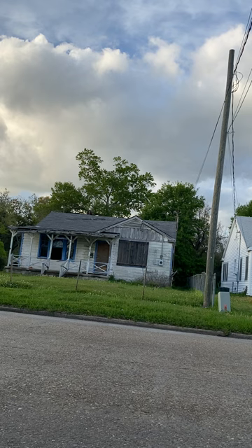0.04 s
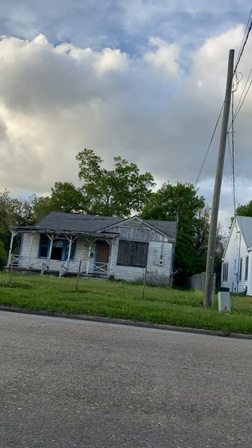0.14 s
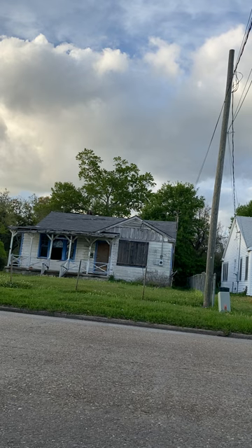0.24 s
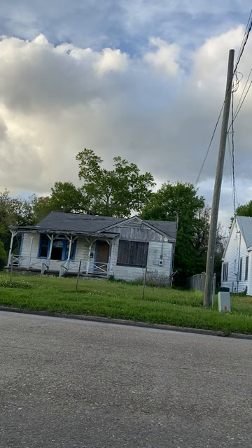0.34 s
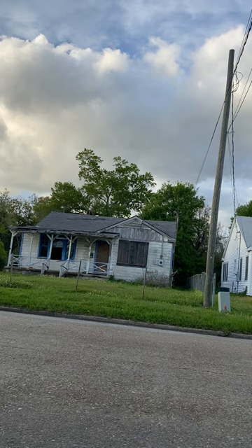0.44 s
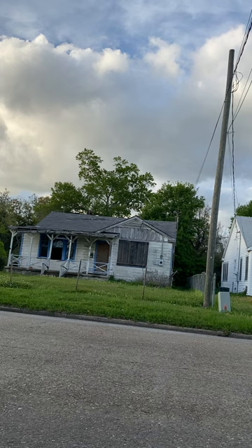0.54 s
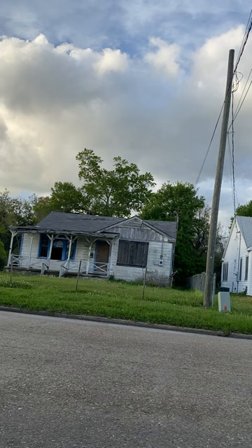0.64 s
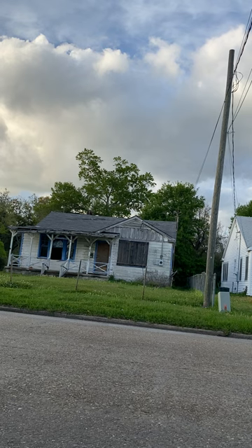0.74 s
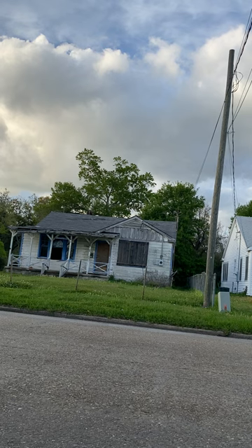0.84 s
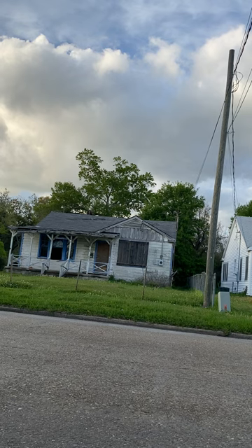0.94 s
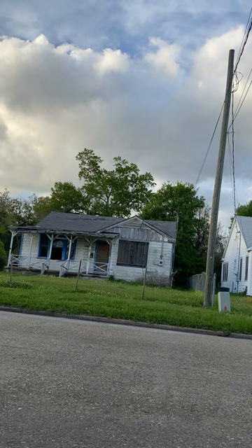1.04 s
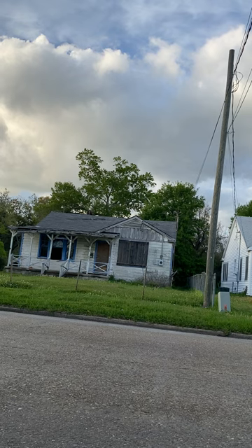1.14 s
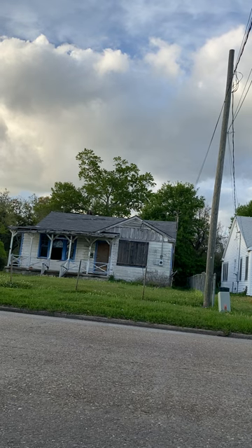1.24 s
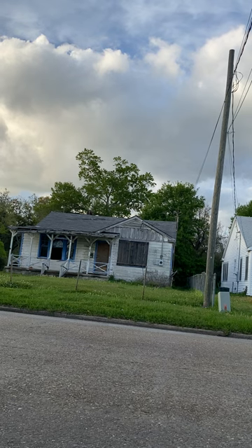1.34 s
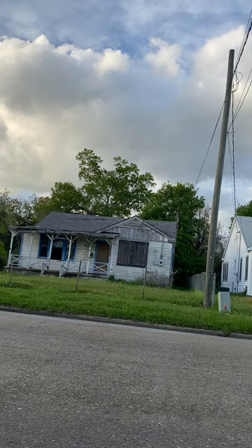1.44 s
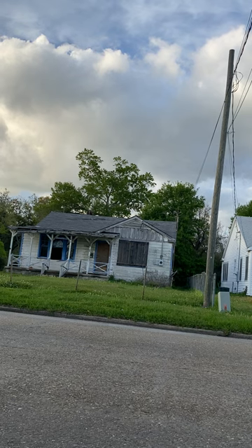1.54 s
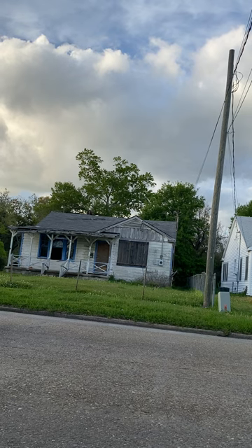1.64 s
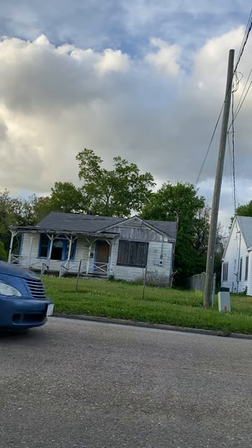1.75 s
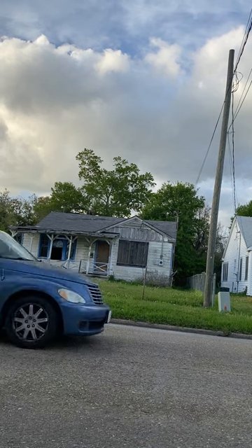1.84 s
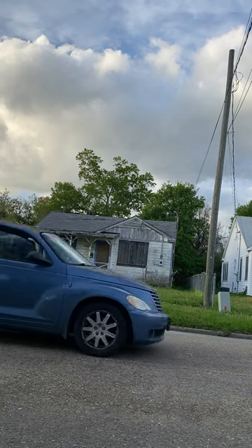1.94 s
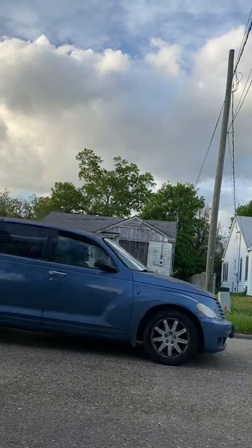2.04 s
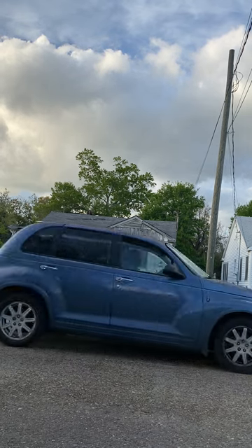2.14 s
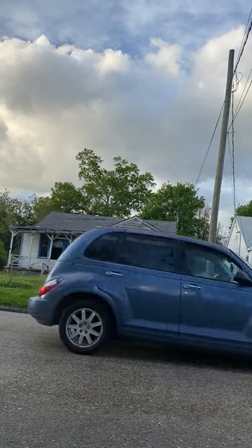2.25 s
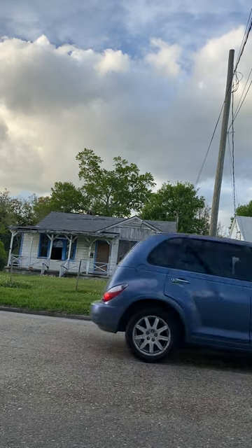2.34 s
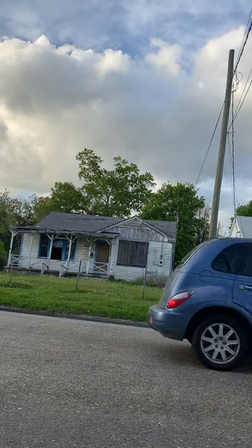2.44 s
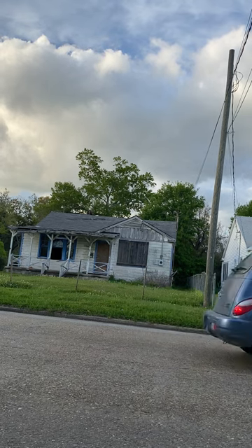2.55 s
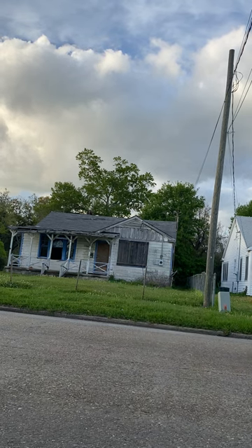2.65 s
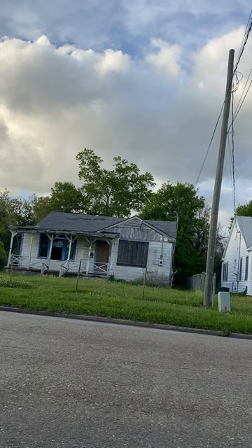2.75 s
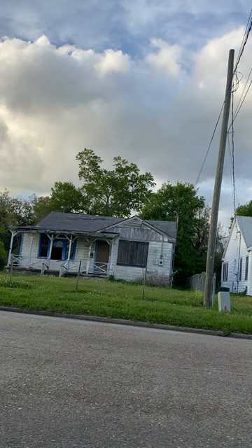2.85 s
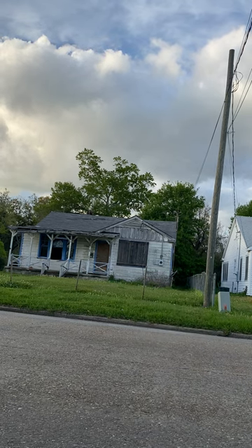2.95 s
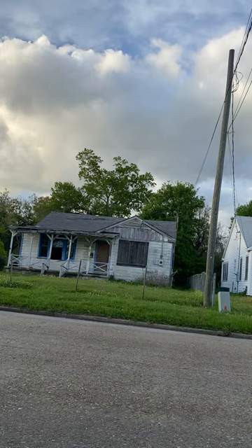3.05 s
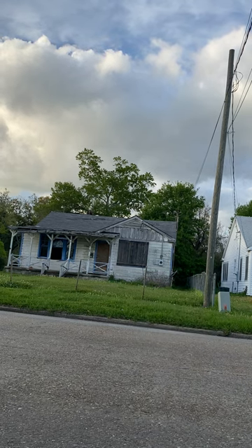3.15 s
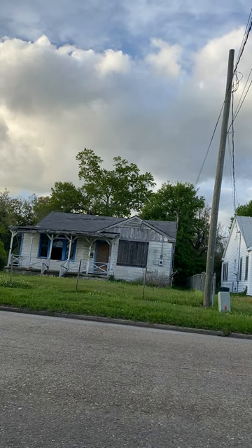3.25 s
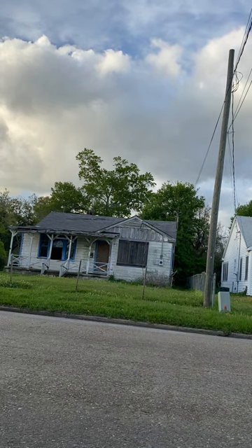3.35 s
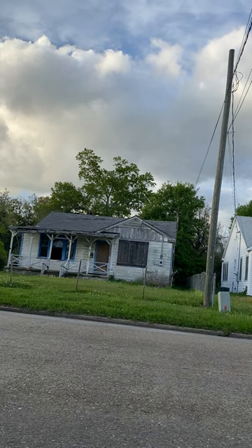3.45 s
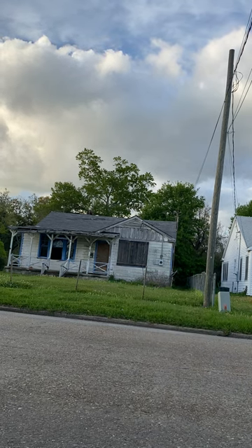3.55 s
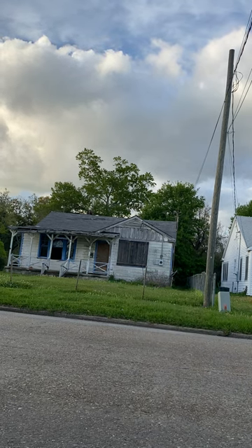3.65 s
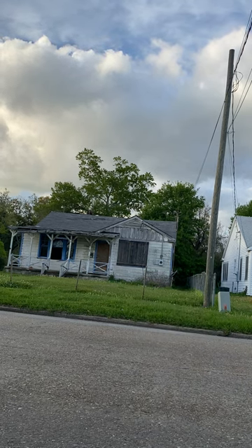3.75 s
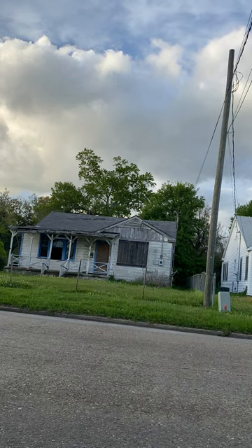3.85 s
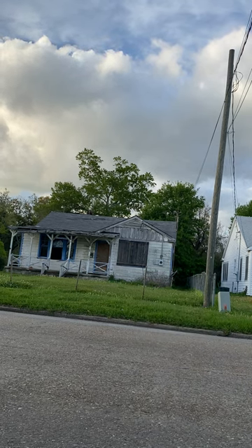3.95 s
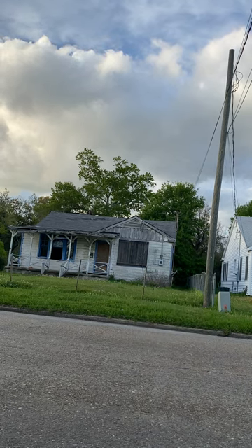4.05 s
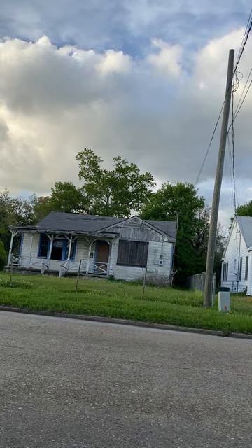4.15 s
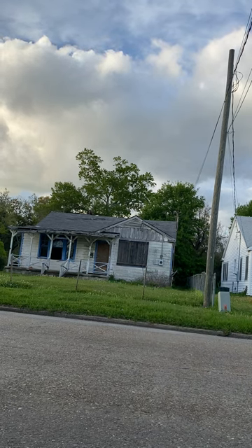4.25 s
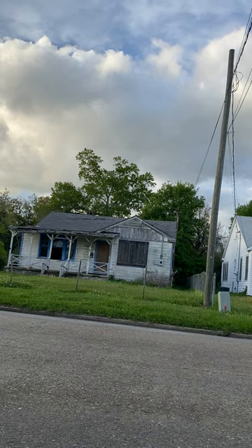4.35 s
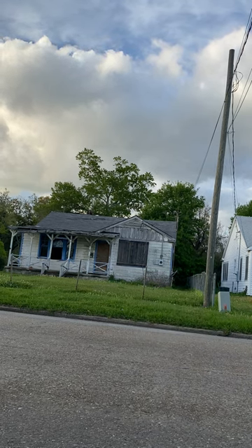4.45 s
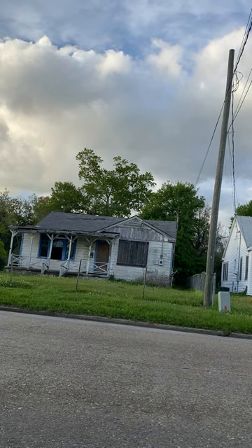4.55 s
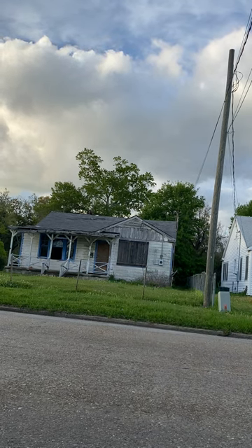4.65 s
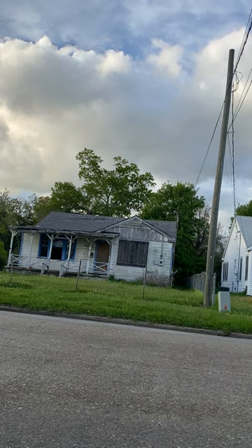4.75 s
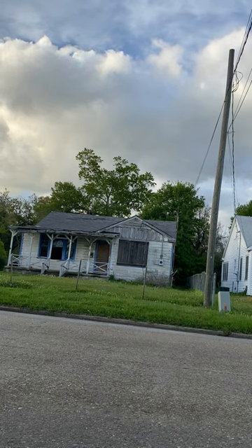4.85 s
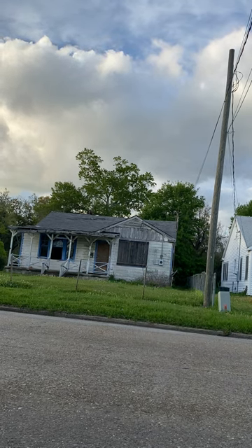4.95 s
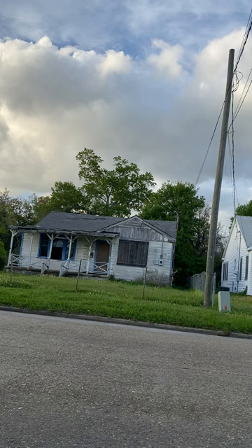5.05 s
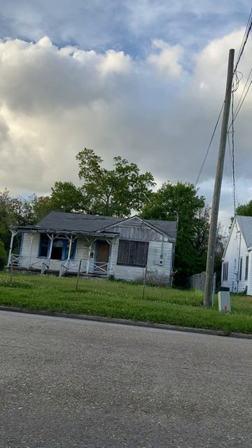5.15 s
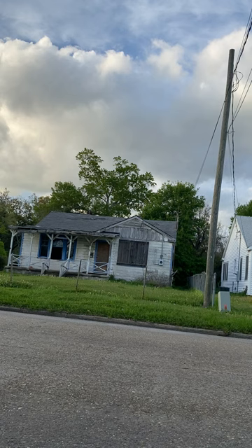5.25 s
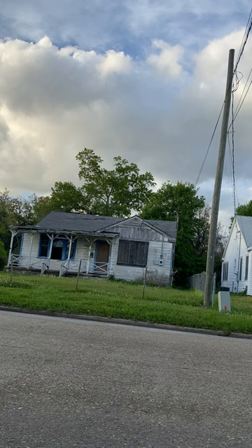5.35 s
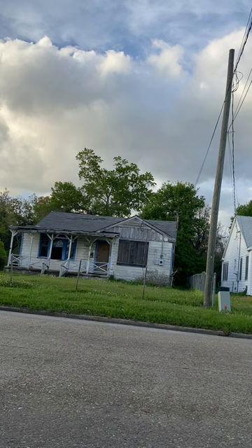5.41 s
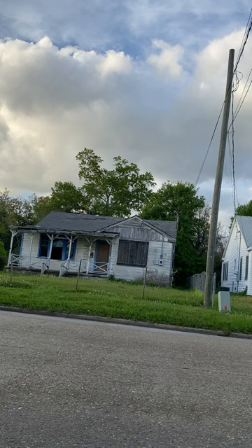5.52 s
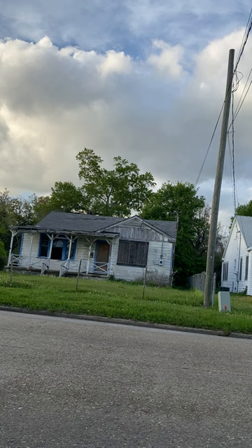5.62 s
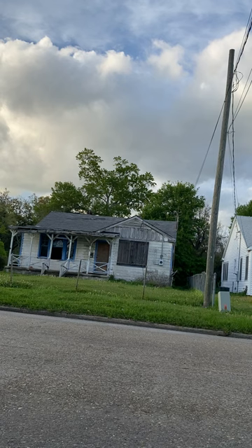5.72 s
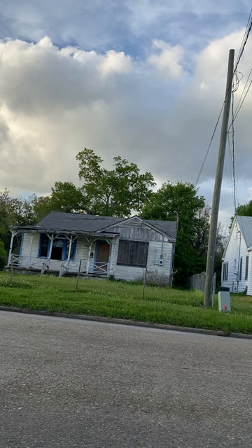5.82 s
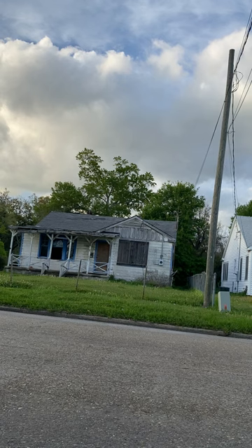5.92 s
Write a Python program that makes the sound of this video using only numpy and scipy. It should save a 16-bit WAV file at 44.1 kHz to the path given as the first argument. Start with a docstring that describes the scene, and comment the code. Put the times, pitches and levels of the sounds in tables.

```python
"""A quiet street: a car rolls slowly past a phone from left to right and pulls away.
The tyres are shaped noise: they roar and hiss on coarse asphalt, thump over seams and flick grit.
Engine, exhaust and tyre hums are wandering sines. As the car leaves, birds sing gliding tones.
Below the treble, the phone's two microphone ports turn bearing into phase and left-right balance."""
import sys
import numpy as np
from scipy import signal
from scipy.io import wavfile
from scipy.ndimage import uniform_filter1d

SR = 44100
rng = np.random.default_rng(int(sys.argv[2]) if len(sys.argv) > 2 else 0)


def unload_audio(sound):
    """Save the sound as a 16-bit wav file, at the path given as the first command line argument."""
    columns = np.transpose(np.atleast_2d(sound))
    # keep every value between -1 and 1, then stretch to whole-number steps
    steps = np.round(np.clip(columns, -1, 1) * 32767)
    wavfile.write(sys.argv[1], SR, steps.astype(np.int16))


N = 263718
FRAME, HOP = 2048, 512  # samples in each short slice of sound, and from one slice to the next

# the car's way past: (time [s], bearing at the ports, side of the car that colours the noise);
# both run 0 coming from the left, 1 abreast, 2 leaving right, 3 gone into the street noise
PATH = [(.75, 0, 0), (1.25, .17, .4), (1.75, .6, .92), (2.2, 1.05, 1.07), (2.9, 1.9, 1.83), (3.35, 2, 2),
        (4.25, 2.1, 2.1), (5.1, 3, 3)]
# wheels over seams in the road: (time [s], level [dB], top of the burst [Hz], fall by 60 dB [s],
# level of the tyre's ring [dB], dip of the roar just before [dB])
THUMPS = [(.826, -35, 1150, 0.26, -41, -1), (1.357, -29, 696, 0.2, -33, -2),
          (1.660, -26.5, 874, 0.3, -26, -2), (2.32, -29, 399.4, 0.14, -33, -1),
          (2.53, -31, 490, 0.16, -35, -1), (2.834, -28.5, 1458, 0.26, -28, -7),
          (3.786, -40, 1500, 0.06, -46, -6), (4.277, -45, 503, 0.11, -48, -1)]


def gain_of(db):
    """Turns decibels into a plain multiplier."""
    return 10 ** (np.asarray(db) / 20)


def evened(x):
    """Scales a signal to an average (rms) size of one."""
    return x / np.sqrt(np.mean(x ** 2) + 1e-20)


def columns(table, at):
    """Reads every column of a table at the points asked for, with straight lines between rows."""
    points, *rest = np.transpose(table)
    return [np.interp(at, points, column) for column in rest]


def add(mix, s, sound):
    """Adds a sound into the mix from s seconds on, cut off at the end."""
    part = mix[..., round(s * SR):][..., :sound.shape[-1]]
    part += sound[..., :part.shape[-1]]


def along(bearing, rows):
    """Blends four rows over frequency into a frequency x time field along the car's path."""
    share = np.maximum(1 - abs(bearing - np.arange(4)[:, None]), 0)
    return np.transpose(rows) @ share


def tyres(hz, t):
    """Road noise: its size in each frequency x time cell, with drifting patches."""
    # the pass: (time [s], tyre roar [dB], added to the rumble [dB], added to the hiss [dB])
    car_pass = [(0, -35.5, -1.5, 1), (.3, -34, 4, 1), (.9, -31.5, -1.5, 0), (1.4, -30, -0.5, -1.5),
                (1.65, -30, -0.5, -2.5), (1.9, -30, 1, 0), (2.15, -29.5, 0, -2), (2.4, -31, 3, -2),
                (2.9, -32, 2, -2.5), (3.4, -37, 4.5, 0), (3.9, -38.5, 2.5, 2.5), (4.3, -42.5, 5.5, 5.5),
                (4.7, -44.5, 2.5, 1), (5.3, -47, 1.2, -2.5), (5.98, -47.5, 2.5, -1)]
    # colour at each of the four sides: (frequency [Hz], level per Hz above the roar level [dB])
    colours = [
        [(25, -25), (50, -22.5), (85, -14), (140, -25.5), (240, -24), (340, -29), (620, -24.5), (1100, -25),
         (1700, -32.5), (2400, -42), (3600, -44), (5200, -54), (8000, -59.5), (15500, -75)],
        [(25, -31), (50, -19.5), (85, -16.5), (140, -17.5), (240, -19), (340, -26.5), (620, -24), (1100, -23),
         (1700, -35.5), (2400, -42.5), (3600, -47), (5200, -42.5), (8000, -52.5), (15500, -62.5)],
        [(25, -55), (50, -12), (85, -20.5), (140, -20), (240, -21.5), (340, -27), (620, -27), (1100, -25),
         (1700, -34.5), (2400, -47.5), (3600, -48.5), (5200, -49.5), (8000, -60.5), (15500, -71.5)],
        [(25, -35), (50, -10.5), (85, -9.5), (140, -12), (240, -19), (340, -29), (620, -26), (1100, -29),
         (1700, -35), (2400, -40.5), (3600, -38), (5200, -46), (8000, -55), (15500, -77.5)],
    ]
    # humps and dips of tread grooves and wheel arches: (centre [Hz], width [Hz], level [dB])
    tread = [(540, 103, 0), (835, 174, -2.5), (985, 160, 1), (1990, 100, 1.5), (2970, 390, 1.5),
             (4160, 1000, -3.5), (5000, 490, 2.5)]
    # the microphone's own treble colour: (frequency [Hz], level [dB])
    mic = [(6000, -1), (7000, 0.4), (8000, 4), (9500, -1.5), (11300, 0.5), (12500, 1.5), (14000, 0),
           (15700, 5)]
    roar_db, rumble_db, hiss_db = columns(car_pass, t)
    side = columns(PATH, t)[1]
    rows = []
    for colour in colours:
        colour_hz, level_db = np.transpose(colour)
        rows.append(np.interp(np.log(hz + 1), np.log(colour_hz), level_db))
    colour_db = along(side, rows)

    low = 1 / (1 + (hz / 300) ** 4)
    high = 1 / (1 + (2600 / (hz + 1)) ** 6)
    top = 1 / (1 + (7500 / (hz + 1)) ** 6)  # the finest fizz stays out of the hiss swell
    colour_db += np.outer(low, rumble_db) + np.outer(high - top, hiss_db)
    colour_db += sum(db * np.exp(-((hz - f) / width) ** 2) for f, width, db in tread)[:, None]
    colour_db += columns(mic, hz)[0][:, None]

    patches = uniform_filter1d(rng.standard_normal(colour_db.shape), size=12, axis=0)
    patches = evened(uniform_filter1d(patches, size=3, axis=1))
    flicker = uniform_filter1d(rng.standard_normal(colour_db.shape), size=90, axis=0)
    flicker = evened(uniform_filter1d(flicker, size=2, axis=1))
    flicker = flicker + 0.33 * rng.standard_normal(len(t))  # part of it is shared by all the treble
    colour_db += 1.4 * high[:, None] * flicker  # the hiss flickers finely and at random
    below = np.minimum(hz / 42, 1) ** 3.5  # the microphone loses the deepest bass
    return below[:, None] * gain_of(colour_db + roar_db + 1.1 * patches)


def fuzzy_tone(table, width_hz, fuzz):
    """A sine on a pitch curve; a share of it (fuzz, 0-1) wanders in size and phase, faster if wide."""
    t = np.arange(N) / SR
    hz, db = columns(table, t)
    r = np.exp(-np.pi * width_hz / SR)
    a, b = (evened(signal.lfilter([1], [1, -2 * r, r * r], v)) for v in rng.standard_normal((2, N)))
    wander = np.sqrt(1 - fuzz ** 2) + fuzz * (a + 1j * b) / np.sqrt(2)
    since_start, until_end = t - table[0][0] + .01, table[-1][0] - t + .01
    edges = np.clip(np.minimum(since_start, until_end) / .05, 0, 1)
    wave = (wander * np.exp(2j * np.pi * np.cumsum(hz) / SR)).real
    return np.sqrt(2) * gain_of(db) * edges * wave


def hums():
    """Engine firing tone, exhaust drones, the tyres' air ring, whines and sizzle, all fuzzy sines."""
    # engine firing tone, slowing and then picking up: (time [s], pitch [Hz], level [dB])
    firing = [(0, 49, -41), (.8, 39.2, -42), (1.3, 35.62, -48), (1.8, 35.97, -47), (2.5, 33.8, -38),
              (3.2, 30.7, -62), (3.8, 32.74, -52), (4.2, 38, -36), (4.5, 34.67, -52)]
    # exhaust drones, one sinking as the car draws level, an upper and a lower one as it pulls
    # away: (time [s], pitch [Hz], level [dB])
    drones = [
        [(0, 103.6, -37.5), (.6, 105.4, -66), (.85, 106.3, -41), (1.15, 106.4, -49), (1.38, 96.8, -39),
         (1.54, 96.6, -40), (1.7, 100.8, -47), (1.9, 95.2, -38), (2.05, 87.8, -31), (2.2, 84.7, -41),
         (2.35, 81.9, -33.5), (2.6, 76, -52)],
        [(3.86, 120.1, -37.5), (4.1, 123.7, -43), (4.25, 130.6, -41), (4.6, 135.2, -44.5), (4.83, 130.7, -38),
         (4.97, 129.4, -53.5), (5.3, 124.5, -46), (5.38, 124.5, -38.5), (5.59, 123.4, -39), (5.68, 123, -49),
         (5.98, 122, -63)],
        [(3.2, 77.1, -43), (3.6, 78.2, -41), (3.8, 74.5, -36.5), (4.03, 75.3, -46), (4.28, 75.2, -39.5),
         (4.45, 82.64, -45), (5.24, 82, -46.5), (5.57, 74.25, -51), (5.69, 74.5, -37.5), (5.98, 76, -47)],
    ]
    # two hums of the air ring inside the tyres, the upper one starting later:
    # (time [s], pitch [Hz], level [dB])
    tyre_ring = [
        [(0, 213.2, -54.5), (.5, 214.4, -48.5), (.93, 215.7, -41), (1.25, 215.4, -52), (1.6, 210, -58),
         (1.72, 207, -30), (1.9, 205, -54)],
        [(1.6, 244, -53), (1.7, 243, -41), (1.85, 244, -35.5), (1.95, 242, -38.5), (2.07, 240, -34),
         (2.2, 240, -38.5), (2.45, 250, -40.5), (2.65, 245, -39), (2.75, 228, -42), (2.88, 234, -35),
         (2.98, 245, -43), (3.15, 258, -41), (3.55, 241.3, -48)],
    ]
    # thin whines of tread blocks and a belt: (time [s], pitch [Hz], level [dB])
    whines = [
        [(3.45, 585, -53), (3.58, 600, -49), (3.65, 650, -54), (3.85, 661, -55), (4.05, 638, -53),
         (4.2, 657, -65), (4.35, 644, -60)],
        [(3.7, 585, -48), (3.95, 598, -56), (4.08, 629, -49), (4.2, 598, -54), (4.45, 589.7, -59.5),
         (4.68, 598, -70)],
        [(1.6, 11300, -72), (2., 11340, -71), (2.3, 11270, -67), (2.5, 11280, -75)],
    ]
    # two gritty bright bands in the hiss while the tyres are nearest:
    # (time [s], pitch [Hz], level [dB])
    sizzle = [
        [(1.3, 5350, -62), (1.55, 5395, -58), (1.72, 5270, -55), (1.92, 5300, -74), (2.1, 5300, -76),
         (2.4, 5246, -73)],
        [(1.4, 4800, -63), (1.7, 4830, -59), (1.93, 4770, -52), (2.15, 4720, -71), (2.4, 4670, -76)],
    ]
    out = fuzzy_tone(firing, width_hz=2.6, fuzz=0.54)
    out += sum(fuzzy_tone(curve, width_hz=10, fuzz=0.25) for curve in drones)
    out += sum(fuzzy_tone(curve, width_hz=20, fuzz=0.55) for curve in whines)
    out += sum(fuzzy_tone(curve, width_hz=12, fuzz=0.35) for curve in tyre_ring)
    return out + sum(fuzzy_tone(curve, width_hz=440, fuzz=0.87) for curve in sizzle)


def thumps():
    """Wheels over seams: each is a dull burst of noise that makes the struck tyre ring."""
    # how a struck tyre rings: (pitch before a small random shift [Hz], level against the thump's
    # ring level [dB], fall by 60 dB [s])
    tyre_modes = [(95, -1, 0.37), (226, -11, 0.32), (672, -19, 0.34)]
    hold_s = .022
    out, t = np.zeros(N), np.arange(8000) / SR
    after = np.maximum(t - hold_s, 0)
    for s, db, top_hz, t60_s, ring_db, _ in THUMPS:
        band = signal.butter(4, [60, top_hz], "band", fs=SR, output="sos")
        burst = signal.sosfilt(band, rng.standard_normal(len(t)))
        burst = evened(signal.lfilter([1], [1, -.95], burst))  # heavier in the bass
        sound = burst * gain_of(db - 60 * after / t60_s)
        for mode_hz, mode_db, mode_t60_s in tyre_modes:
            turns = mode_hz * rng.uniform(.96, 1.04) * t + rng.random()
            sound += gain_of(ring_db + mode_db - 60 * after / mode_t60_s) * np.sin(2 * np.pi * turns)
        add(out, s, sound * (1 - np.exp(-t / .001)))  # soft start
    return out


def knock():
    """A hollow knock: one tone that swells quickly and dies."""
    start_s, swell_s, t60_s = .3073, .007, .035
    level_db, pitch_hz = -21, 582
    out, t = np.zeros(N), np.arange(8000) / SR
    dying = gain_of(level_db - 60 * np.maximum(t - swell_s, 0) / t60_s)
    swell = np.sqrt(np.minimum(t / swell_s, 1))
    add(out, start_s, dying * swell * np.sin(2 * np.pi * pitch_hz * t))
    return out


def grit():
    """Each stone flicked by the tread is a very short ring, with crumbs rattling after it."""
    # flicked stones, ahead of the ports: (time [s], peak level [dB], pitch [Hz], width [Hz],
    # left minus right [dB])
    stones = [(.3075, -34, 2900, 600, 0), (.6096, -39, 2600, 500, 0), (2.4390, -31, 5000, 2200, 0),
              (2.4450, -34, 5900, 2000, 0), (2.4450, -31, 9000, 2600, 0), (2.4450, -38, 13200, 3400, -11),
              (2.7507, -43, 4800, 1200, 0)]
    crumbs_db, crumbs_t60_s, crumbs_share = -19, .06, .025  # share of samples that hold a crumb
    out, t, tail = np.zeros((2, N)), np.arange(400) / SR, np.arange(2000) / SR
    for s, db, hz, width_hz, pan_db in stones:
        u = np.pi * width_hz * t
        ring = u * np.exp(1 - u) * np.sin(2 * np.pi * hz * t)
        crumbs = rng.standard_normal(len(tail)) * (rng.random(len(tail)) < crumbs_share)
        crumbs = crumbs * gain_of(crumbs_db - 60 * tail / crumbs_t60_s)
        hits = np.where(tail > .001, crumbs, tail == 0)  # the stone first, then its crumbs
        sides = gain_of(db + pan_db * np.array([[.5], [-.5]]))
        add(out, s, sides * np.convolve(hits, ring))
    return out


def dips(noise):
    """The roar, not the hiss, sinks for a moment before each thump and is back with it."""
    dip_s, top_hz = .022, 1800
    dip_db, sink = np.zeros(N), np.sqrt(np.linspace(0, 1, round(dip_s * SR)))
    for s, *_, depth_db in THUMPS:
        add(dip_db, s - dip_s, depth_db * sink)
    roar = signal.sosfiltfilt(signal.butter(2, top_hz, fs=SR, output="sos"), noise)
    return noise + roar * (gain_of(uniform_filter1d(dip_db, size=44)) - 1)


def car():
    """All car sounds in two channels; below the treble, phase, likeness and balance follow bearing."""
    # the two ports at each of the four bearings: (frequency [Hz], left leads by [radians],
    # likeness of the two sides [0-1], left minus right [dB])
    ports = [
        [(150, 0.01, 1.0, -0.2), (300, 0.19, 0.98, -0.9), (600, 0.7, 0.99, 2.5), (1100, 0.66, 0.95, 7.0),
         (1700, 0.71, 0.97, 3.1), (2200, 1.87, 0.9, 1.6), (2700, 1.88, 0.89, 5.5), (3400, 1.18, 0.85, 3.6),
         (4000, 1.43, 0.84, 2.2), (4600, 2.75, 0.67, -1.1), (5200, 5.87, 0.42, 4.4), (5800, 7.59, 0.82, 2.1)],
        [(150, -0.01, 1.0, -0.1), (300, -0.03, 1.0, -0.7), (600, -0.08, 0.96, -0.4), (1100, 0.03, 0.97, 0.3),
         (1700, 0.09, 0.97, -0.5), (2200, 0.34, 0.86, -4.9), (2700, -2.0, 0.61, -3.1),
         (3400, -3.46, 0.42, -0.2), (4000, -1.52, 0.2, -4.1), (4600, -1.04, 0.58, -4.8),
         (5200, 0.26, 0.63, -2.0), (5800, 1.34, 0.83, 0.4)],
        [(150, -0.03, 1.0, -0.2), (300, -0.23, 0.98, -0.8), (600, -0.82, 0.95, -2.5), (1100, -0.99, 0.93, -3.2),
         (1700, -0.84, 0.93, -0.6), (2200, -0.59, 0.53, 4.7), (2700, -2.4, 0.59, 1.6), (3400, -1.71, 0.47, 1.0),
         (4000, -0.2, 0.36, 3.9), (4600, 1.8, 0.69, 2.6), (5200, 1.15, 0.86, 0.4), (5800, 1.41, 0.84, -1.2)],
        [(150, 0.0, 1.0, -0.2), (300, 0.05, 0.95, -0.7), (600, -0.33, 0.57, -0.9), (1100, -0.8, 0.69, -2.2),
         (1700, -0.55, 0.68, 0.0), (2200, 0.42, 0.3, 2.0), (2700, 0.09, 0.42, -1.2), (3400, 0.04, 0.4, 0.6),
         (4000, 0.71, 0.54, 1.6), (4600, 1.65, 0.35, 1.8), (5200, 1.06, 0.74, 2.6), (5800, 1.41, 0.8, 0.4)],
    ]
    # the treble keeps one left-right phase whatever the bearing, winding on as pitch rises:
    # (frequency [Hz], left leads by [half turns], likeness of the two sides [0-1])
    treble_phase = [(5800, .42, .83), (6600, .79, .87), (6950, 1, 1), (7650, 1, 1), (8200, 1.23, .79),
                    (9400, 1.7, .7), (9800, 2, 1), (10900, 2, 1), (11400, 2.24, .74), (12200, 2.62, .57),
                    (12700, 3, 1), (14300, 3, 1), (14600, 3.25, .58), (15800, 3.72, .66)]
    solid_sound = hums() + thumps() + knock() + grit()
    hz, t, solid = signal.stft(solid_sound, SR, nperseg=FRAME, noverlap=FRAME - HOP)
    pairs = [columns(p, hz) for p in ports]
    half_turns, treble_like = columns(treble_phase, hz)
    treble = (hz > treble_phase[0][0])[:, None]
    bearing = columns(PATH, t)[0]

    # a complex link holds likeness as its size and the left side's lead as its angle
    link = along(bearing, [like * np.exp(1j * lead) for lead, like, _ in pairs])
    link *= along(bearing, [like for _, like, _ in pairs]) / (abs(link) + 1e-9)
    link = np.where(treble, (treble_like * np.exp(1j * np.pi * half_turns))[:, None], link)
    like, turn = np.minimum(abs(link), 1), np.conj(link) / (abs(link) + 1e-9)
    # the balance evens out in treble and bass
    fading = np.clip(np.minimum((6600 - hz) / 800, hz / 150) ** 3, 0, 1)[:, None]
    tilt = gain_of(fading * along(bearing, [db for _, _, db in pairs]))

    a, b, c, d = rng.standard_normal((len(t), len(hz), 4)).T
    shared, apart = a + 1j * b, c + 1j * d
    size = tyres(hz, t) * np.sqrt(3 * SR / FRAME / 8)  # level per Hz to the size of a cell
    left = size * shared + solid[0]
    right = turn * (size * (like * shared + np.sqrt(1 - like ** 2) * apart) + solid[1])
    both = np.array([tilt * left, right]) * np.sqrt(2 / (1 + tilt ** 2))
    return dips(signal.istft(both, SR, nperseg=FRAME, noverlap=FRAME - HOP)[1][:, :N])


def chirp(s, top_hz, up_db, down_db, lead_in_db):
    """One bird chirp: the arch placed at a time, pitch and strength."""
    # a soft slow lead-in and a round arch: (time from the top [s], share of the top pitch,
    # level [dB])
    arch = [(-.07, .58, -22), (-.045, .64, -15), (-.024, .72, -11), (-.021, .75, -1), (-.013, .9, 0),
            (-.006, .985, -4), (.003, .995, -4), (.014, .88, 0), (.028, .75, -2)]
    lead_in_end_s = -.022
    at, share, db = np.transpose(arch)
    strength_db = np.where(at < 0, up_db, down_db) + lead_in_db * (at < lead_in_end_s)
    return np.transpose([s + at, top_hz * share, db + strength_db])


def sung(note, pan_db, lead, top_lead=0):
    """A pure gliding note; the ports give it a balance and a phase lead in radians, more near 3 kHz."""
    t = np.arange(note[0][0], note[-1][0], 1 / SR)
    hz, db = columns(note, t)
    hz = uniform_filter1d(hz, size=120, mode="nearest")
    # air and leaves make it flutter
    flutter_db = 3 * evened(uniform_filter1d(rng.standard_normal((2, len(t))), size=120))
    half = np.array([[.5], [-.5]])
    apart = (lead + top_lead * np.clip((hz - 2800) / 250, 0, 1)) * half
    wave = np.sqrt(2) * np.sin(2 * np.pi * np.cumsum(hz) / SR + apart)
    return gain_of(db + flutter_db + pan_db * half) * wave * signal.windows.tukey(len(t), .15)


def birds():
    """Arched chirps with their slap echoes, short straight glides, and a scatter from the street."""
    # a near bird on the right, before the arch shapes it: (time of the top [s], top pitch [Hz],
    # level going up [dB], level coming down [dB])
    chirps = [(4.952, 3130, -58.5, -59.5), (5.265, 3120, -55, -55.5), (5.568, 3080, -55, -53.5),
              (5.829, 3070, -56.5, -53.5)]
    # house fronts throw each chirp back: (delay [s], level [dB], added to the lead-in [dB],
    # left minus right [dB], left leads by [radians])
    slaps = [(.009, -7, 0, 9, 1.5), (.13, -6, 5, 8, 2.5), (.146, -8.5, 14, -6, .4), (.213, -13, -6, 5, 1.2)]
    # short straight glides: whistles, pieces of a curved whistle and parts of chirps:
    # (start [s], length [s], from [Hz], to [Hz], level [dB], left minus right [dB],
    # left leads by [radians])
    glides = [(4.276, .025, 2910, 2340, -62.5, 0, .8), (4.593, .025, 2927, 2330, -60, 0, 1),
              (4.726, .05, 2440, 2050, -68, 0, 1.1), (4.905, .082, 3760, 3250, -67.5, -5, 2.7),
              (4.975, .055, 3760, 3540, -66, -7, .3), (5.03, .055, 3540, 3120, -66, -6, .3),
              (5.085, .065, 3120, 2860, -68, -5, .8), (5.03, .025, 3000, 2940, -65, -2, 2.9),
              (5.172, .042, 3570, 3350, -67, 2, .3), (5.22, .02, 3230, 3190, -67, -5, .5),
              (5.328, .018, 1600, 2115, -60, 0, .66), (5.835, .04, 3750, 3400, -68, -2, .8)]
    out = np.zeros((2, N))
    # the direct chirp; its last number turns the top of the arch toward opposite phase [radians]
    direct = (0.00097, 0, 0, -6, .15, 2.6)
    arrivals = [direct] + [tuple(slap) + (0,) for slap in slaps]
    for s, top_hz, up_db, down_db in chirps:
        for delay, db, lead_in_db, pan_db, lead, top_lead in arrivals:
            note = chirp(s + delay, top_hz, up_db + db, down_db + db, lead_in_db)
            add(out, note[0][0], sung(note, pan_db, lead, top_lead))
    for s, length, from_hz, to_hz, db, pan_db, lead in glides:
        add(out, s, sung([(s, from_hz, db), (s + length, to_hz, db)], pan_db, lead))

    t = np.arange(9000) / SR
    echoes = rng.standard_normal((2, len(t))) * (rng.random((2, len(t))) < .04)  # sparse
    echoes = echoes * gain_of(-60 * t / .4) * (t > .004)
    scatter = signal.fftconvolve(out, echoes / np.linalg.norm(echoes[0]), axes=1)[:, :N]
    return out + gain_of(-10) * scatter


def scene():
    """The passing car and the birds together, in two channels."""
    return car() + birds()


def record(dry):
    """The band limit of the phone: a steep filter takes away the highest treble."""
    edge_hz = 15780
    band_limit = signal.firwin(1023, edge_hz, window=("kaiser", 9), fs=SR)
    return signal.oaconvolve(dry, band_limit[None], "same")


dry = scene()
out = record(dry)
unload_audio(out)
```